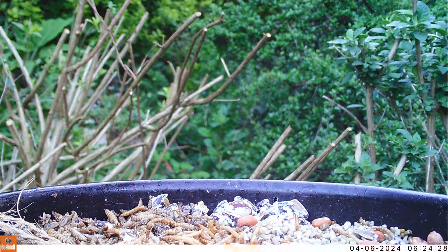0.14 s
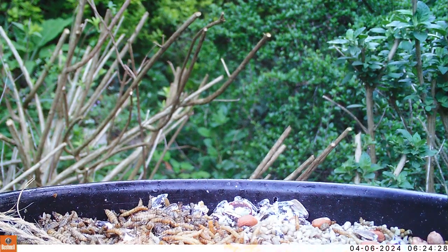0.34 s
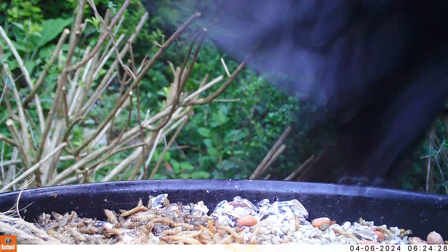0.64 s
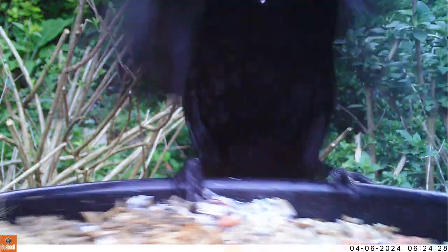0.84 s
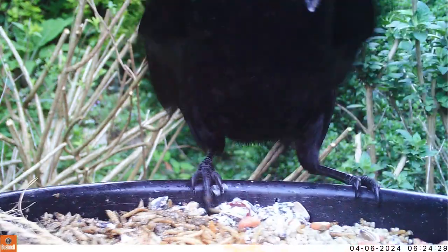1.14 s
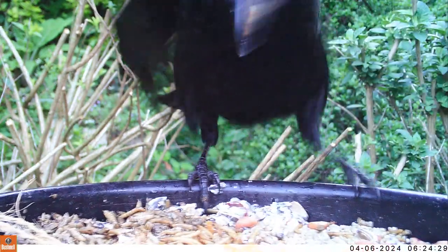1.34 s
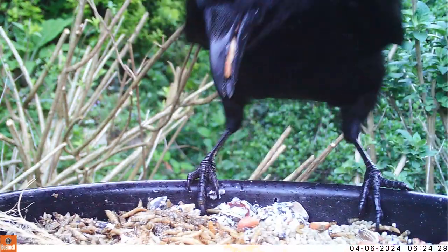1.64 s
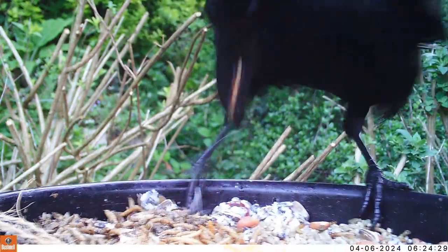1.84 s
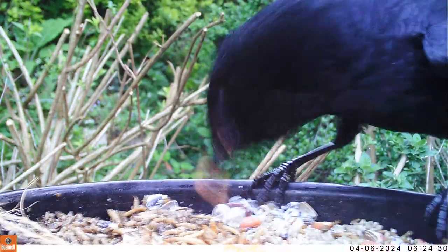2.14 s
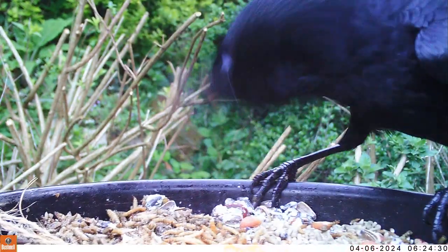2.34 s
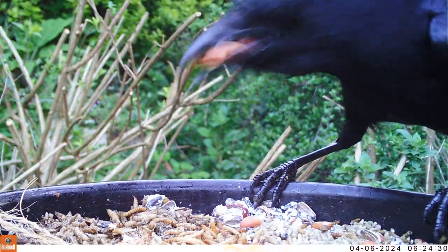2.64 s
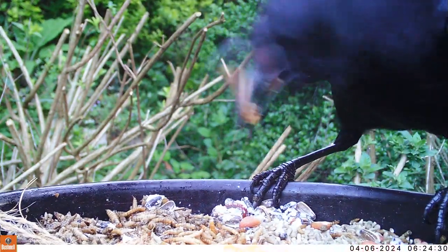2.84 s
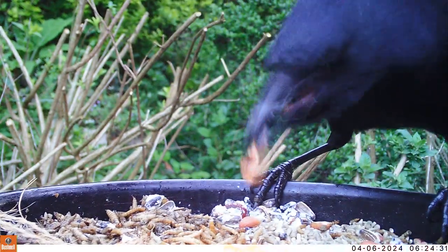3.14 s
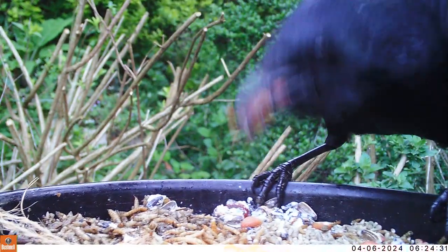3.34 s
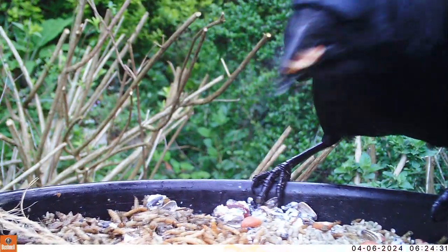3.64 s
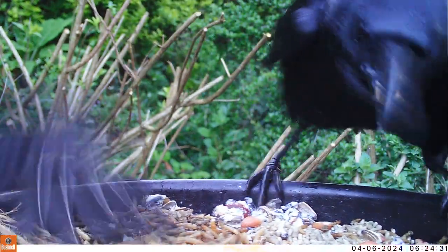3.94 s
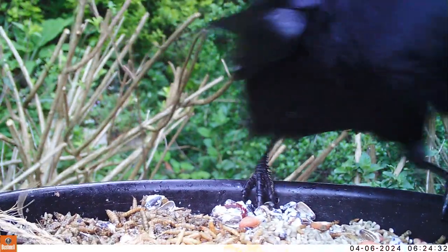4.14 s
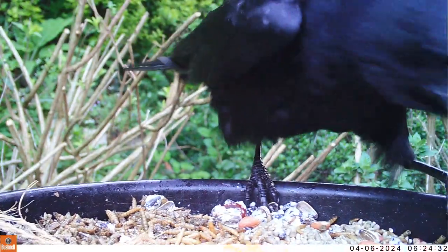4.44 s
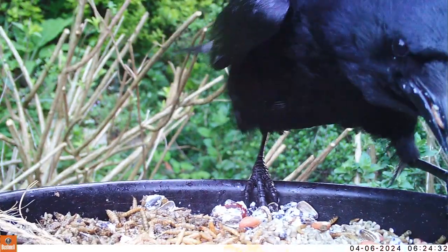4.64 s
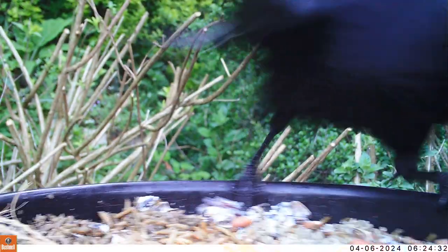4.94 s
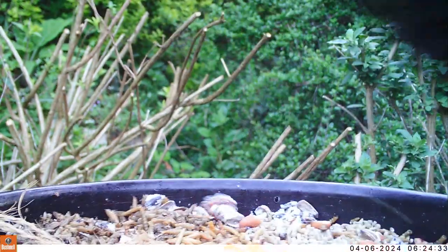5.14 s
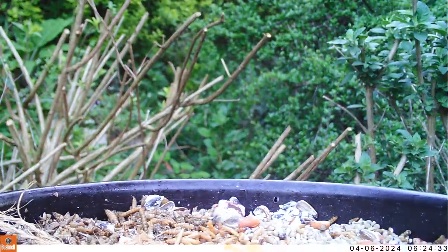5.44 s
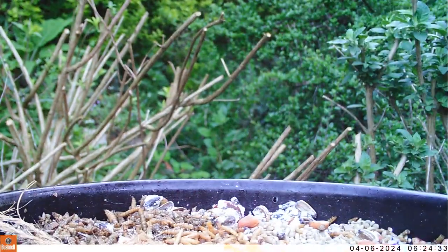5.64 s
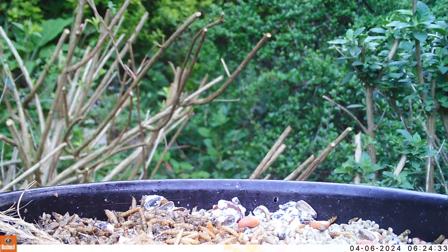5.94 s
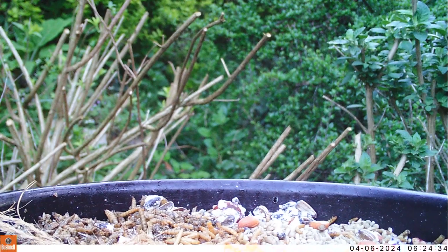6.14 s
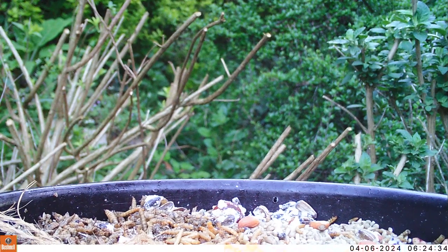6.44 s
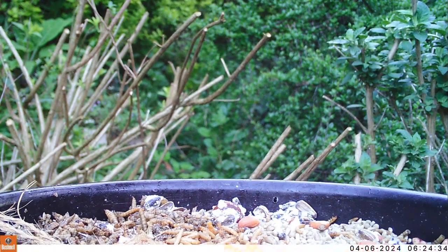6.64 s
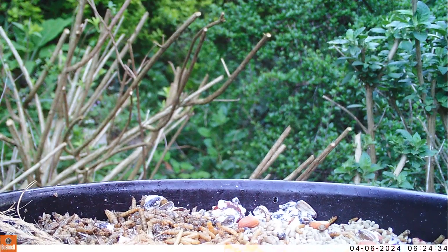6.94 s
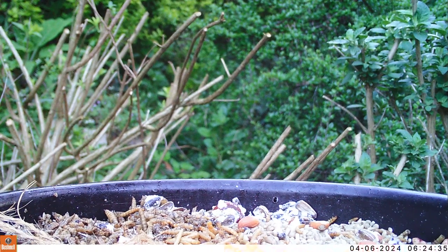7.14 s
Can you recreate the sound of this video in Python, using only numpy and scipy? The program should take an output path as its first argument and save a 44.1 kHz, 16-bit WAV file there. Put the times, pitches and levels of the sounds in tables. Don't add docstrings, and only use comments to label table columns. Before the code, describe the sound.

Loud raspy caws near the microphone, distant echoing crow calls, sharp claw and beak ticks on hard plastic, then low buffeting gusts.

```python
import sys
import numpy as np
from scipy import signal
from scipy.fft import rfft, irfft
from scipy.io import wavfile
from scipy.ndimage import uniform_filter1d

SR = 44100
rng = np.random.default_rng(int(sys.argv[2]) if len(sys.argv) > 2 else 0)


def to_wav(s):
    ch = np.atleast_2d(s).T
    pcm = np.round(np.clip(ch, -1, 1) * 32767)
    wavfile.write(sys.argv[1], SR, pcm.astype(np.int16))


def natural_amplitude(level_db):
    exponent = np.asarray(level_db, float) / 20
    return 10 ** exponent


N = 321048
T = np.arange(N) / SR


def slack_flutter(rate_hz, since_s):
    rush, rush_s = .6, .04
    rate_hz = rate_hz * (1 + rush * np.exp(-since_s / rush_s))
    cycle = np.cumsum(rate_hz * (1 + .04 * walk(30, since_s.shape))) / SR % 1
    ramp = uniform_filter1d(2 * cycle - 1, size=110)
    return ramp * (1 + .12 * walk(50, since_s.shape))


# centre_hz, relative_width, gain_db
NARROW = [
    (3790, 0.042, 5.5),
    (1267, 0.013, -7.5),
    (4746, 0.035, -9.5),
    (1876, 0.022, -9),
    (2620, 0.059, -4),
]


def vocal_tract(f_hz, k, opening, table, build, patchy_db=2.2):
    def between(shut, wide):
        return shut + (wide - shut) * opening

    throat_hz, throat_db = between(1460, 2140), between(11, 3)
    beak_hz, beak_db = between(3850, 3078), between(2, 7)
    throat_share, beak_share, overtone, overtone_db, _ = build
    shape_db = throat_share * throat_db * bump(f_hz / throat_hz, .12)
    shape_db += beak_share * beak_db * bump(f_hz / beak_hz, .052)
    shape_db += overtone_db * bump(k / overtone, .045)
    for centre_hz, width, gain_db in NARROW:
        shape_db += gain_db * bump(f_hz / centre_hz, width)
    shape_db += patchy_db * np.sqrt(np.minimum(f_hz, 2500) / 2000) * walk(40, f_hz.shape)
    size = gain_at(table, f_hz) * natural_amplitude(shape_db)
    return size / np.sqrt((size ** 2).sum(axis=0) / 2)


def breath_noise(phase, table):
    gate = 1 + .27 * np.cos(phase)
    breath = np.gradient(colour(rng.standard_normal(len(phase)) * gate, table))
    return breath / breath.std()


def add_echo(dry, echo_db):
    t60_s, gap_s = .45, .012
    lag = T[:SR // 2]
    echo = rng.standard_normal(len(lag)) * np.exp(-np.log(1000) * lag / t60_s) * (lag > gap_s)
    wet = signal.fftconvolve(dry, echo / np.sqrt(np.sum(echo ** 2))) * natural_amplitude(echo_db)
    wet[:len(dry)] += dry
    return wet


def caw(rows, table, flutter, rasp, build, jitter=.07):
    slack_share, slack_span, unsettled, edge_s = .92, .25, .45, .0018
    s, *columns = np.transpose(rows)
    t = T[int(s[0] * SR):int(s[-1] * SR)]
    hz, db, opening = (np.interp(t, s, c) for c in columns)
    rate_hz, swing, swing_db, breath_db, echo_db, hoarse = flutter
    since = t - t[0]
    rough = rasp + np.maximum(slack_share - hz / np.median(hz), 0) / slack_span
    hoarse = hoarse + unsettled / (1 + (since / build[-1]) ** 8) + rough
    rough = np.clip(rough, 0, 1)
    ramp = slack_flutter(rate_hz, since)

    wobble = jitter * rough ** 2 * walk(250, t.shape) + .006 * walk(30, t.shape)
    hz = hz * (1 + swing * ramp + wobble)
    phase = 2 * np.pi * np.cumsum(hz) / SR
    k = np.arange(1, 14000 // hz.mean())[:, None]
    f_hz = k * hz
    size = vocal_tract(f_hz, k, opening, table, build)
    scatter = hoarse * (f_hz / 4000) ** 1.1 * walk(260, f_hz.shape) + .8 * walk(14, f_hz.shape)
    voice = (size * np.sin(k * phase + .12 * k ** 2 + scatter)).sum(axis=0)

    share = np.clip(natural_amplitude(breath_db) + .8 * rough ** 4, 0, 1)
    mix = np.sqrt(1 - share ** 2) * voice + share * breath_noise(phase, table)
    edge = np.minimum(1, np.minimum(since, t[-1] - t) / edge_s)
    snap_db = swing_db * (1 + 1.5 * rough ** 2) * (ramp - ramp ** 2)
    return int(s[0] * SR), add_echo(mix * natural_amplitude(db + snap_db) * edge, echo_db)


# time_s, pitch_hz, level_db, beak_opening (0-1)
NEAR = [
    [(0.12, 262.2, -44.5, 0), (0.14, 275.2, -25, .1), (0.176, 343, -19, .5), (0.256, 372.6, -14.5, 0.9),
     (0.304, 352.3, -14.5, 0.95), (0.43, 345.4, -16.5, 0.8), (0.53, 331.3, -21, 0),
     (0.562, 306.2, -22, 0.1), (0.603, 238, -41, 0)],
    [(0.825, 240.2, -33.5, 0.36), (0.879, 301.7, -20, 0.6), (0.891, 318, -22, 0.55),
     (0.921, 279.6, -22.5, 0.73), (1.0, 325.8, -19, 0.2), (1.052, 319, -19, 0.2), (1.142, 300.9, -20, 0.66),
     (1.178, 256.3, -24, 0.6), (1.22, 249.3, -47, 0.5)],
    [(3.333, 291.8, -25, 0), (3.345, 319.2, -18, 0.46), (3.374, 361.8, -14.5, 0.87), (3.425, 372.3, -14, 1),
     (3.5, 337.6, -13, .3), (3.642, 327.7, -15, 0.33), (3.72, 309.6, -14.5, 0.01),
     (3.764, 236.8, -24.5, 0.12), (3.79, 226, -52.5, 0)],
]
# time_s, pitch_hz, level_db, beak_opening (0-1)
FAR = [
    [(1.464, 405, -61, 0.6), (1.494, 442.4, -50, 0.93), (1.762, 362.2, -47, 0.62), (1.81, 300, -53, 0.33),
     (1.85, 263, -64, .3)],
    [(2.18, 390.3, -45.5, .7), (2.208, 430.5, -43, 1), (2.494, 343.4, -43.5, 0.4), (2.54, 289.2, -47, .2),
     (2.58, 266.7, -64, 0.1)],
    [(5.59, 285.7, -48, 0.8), (5.6, 312, -46.5, .6), (5.694, 329, -43.5, .7), (5.996, 315.2, -43.5, 0.8),
     (6.196, 286.4, -42.5, 0.02), (6.24, 257, -68.5, 0.1)],
    [(1.89, 318, -59, 0.3), (1.946, 394.4, -51.5, 0.5), (2.224, 312.4, -59, .4), (2.25, 277, -65, .4)],
]
# freq_hz, gain_db
NEAR_COLOURS = [
    [(180, -75), (300, -36.5), (940, -13.5), (1400, -16.5), (1700, -7.5), (2030, -6), (2390, 0),
     (3240, -1.5), (4690, -14), (5780, -14), (9370, -30.5), (11700, -25), (12900, -45.5), (14000, -64)],
    [(160, -67.5), (280, -41), (1200, -14.5), (1510, 5.5), (1640, -11.5), (1930, -18.5), (2310, -12),
     (2550, -20), (2900, -22), (3210, -10.5), (4910, -10), (7040, -28.5), (7640, -26), (11900, -24),
     (14000, -35)],
    [(180, -70), (300, -39.5), (1050, -10), (1300, -20.5), (1450, -5.5), (1600, -2.5), (1790, -10.5),
     (2200, -11.5), (3870, 0), (4060, -7.5), (4690, -12.5), (6270, -12), (9670, -26.5), (10700, -22),
     (12400, -25.5), (13100, -50), (14000, -60)],
]
# freq_hz, gain_db
FAR_COLOURS = [
    [(350, -35), (600, -17), (1590, -2), (1880, 0), (2600, -6), (3020, 1), (3840, -3), (4690, -16.5),
     (5950, -12.5), (7180, -18), (12000, -19.5), (15600, -47.5), (22000, -120)],
    [(350, -54), (600, -23.5), (1140, -2.5), (1480, -7), (1720, 3), (2840, -5), (3740, 2), (4990, -16.5),
     (6020, -13), (7180, -24), (12000, -21.5), (15600, -55), (22000, -120)],
    [(400, -35), (650, -18.5), (1000, -9), (1600, 8), (2000, -1), (2550, -1), (3100, -0.5), (4100, -13),
     (4600, -12.5), (5500, -8), (6300, -16), (7000, -22), (12000, -46)],
    [(500, -13), (750, -7.5), (1100, 3.5), (1300, -8), (1600, -28)],
]
# rate_hz, pitch_swing (0-1), level_swing_db, breath_db, echo_db, hoarseness
FLUTTER = [
    (60, .003, .8, -30, -33, .1),
    (70, .003, .8, -31, -33, .1),
    (52, .04, 3.6, -28, -33, .12),
    (66, .038, 3.8, -21, -8, .25),
    (66, .038, 3.8, -21, -8, .25),
    (46, .035, 3.6, -18, -9, .45),
    (66, .02, 3, -20, -13, 1.2),
]
RASP = [.03, .03, .2, .2, .2, .33, .15]
# throat_share, beak_share, overtone (multiple of pitch), overtone_db, settle_s
BUILD = [
    (.4, .7, 16.2, 7, 0.21),
    (1.1, .9, 15.8, 6.5, 0.15),
    (1.1, 0.8, 17.5, 4, 0.056),
    (.9, 0.75, 15.5, 12.5, .05),
    (.9, .9, 15.5, 12, .05),
    (.9, .9, 17.5, 2, .05),
    (.9, .9, 15.5, 3, .05),
]


def crows():
    out = np.zeros(N + SR)
    for bird in zip(NEAR + FAR, NEAR_COLOURS + FAR_COLOURS, FLUTTER, RASP, BUILD):
        start, sound = caw(*bird)
        out[start:start + len(sound)] += sound
    return out[:N]


# time_s, peak_db,
# sharpness_db, thud_db, length_s
TICKS = [(0.8042, -16.5, -25, -45, 0.0097), (0.809, -2, -23.5, -39, 0.014), (0.8178, -8, -49, -24, 0.0095),
         (2.0615, -39.5, -26, -12, 0.1), (2.1031, -34, -23, -10, 0.0025), (2.157, -30.5, -11.5, -22, 0.013),
         (2.1633, -29, -18, -21, 0.022), (2.193, -30, -22.5, -23, 0.012), (3.3116, -22.5, -27, -31, 0.021),
         (3.323, -15.5, -25, -33.5, 0.013), (3.327, -10.5, -20, -36, 0.027), (3.9768, -36, -9, -24, 0.035),
         (4.067, -22.5, -9.5, -19, 0.046), (4.0737, -24, 6, -3, 0.011), (4.0785, -19.5, -27, -21, 0.012),
         (4.3933, -35, -12, -13, 0.019), (5.057, -36, -46.5, -29.5, 0.022),
         (5.198, -39.5, -43, -59.5, 0.04), (5.204, -27.5, -37.5, -54, 0.04),
         (5.2102, -26.5, -22, -50, 0.015), (5.3064, -44, 6, 1.5, 0.029), (5.467, -31, -11, -9, 0.021),
         (5.4975, -30, -30, -20, 0.016), (5.5572, -16.5, -12.5, -23, 0.011),
         (5.5592, -20.5, -20, -13.5, 0.017), (6.2093, -29, -18, -26, 0.037)]
# time_s, peak_db, sharpness_db
TAPS = [(1.3905, -40, -37.5), (1.561, -37.5, -24.5), (2.0231, -40.5, -41), (2.075, -44, -30.5),
        (2.803, -54.5, -5), (3.139, -51.5, -13), (3.2362, -47.5, -20), (3.941, -39, -11.5),
        (4.198, -40.5, -15), (3.947, -46, -8.5), (4.14, -41, -13), (2.149, -39, -30.5), (2.066, -44, -13.5),
        (5.28, -52, -30), (5.484, -43.5, -25), (5.577, -36.5, -12), (4.4623, -43.5, -17),
        (4.593, -44, -8.5), (4.796, -44.5, -16), (5.371, -39.5, -14.5), (5.938, -37, -10.5),
        (6.406, -47, -3.5), (6.505, -58, -7), (6.66, -48, -24), (7.155, -58.5, 4.5)]
# freq_hz, gain_db
HOUSING = [(350, -64), (600, -18.5), (685, -27.5), (762, -21), (1060, -19.5), (1330, -19), (2550, -14.5),
           (3250, -10.5), (3700, -3), (4000, -0.5), (4690, -15.5), (8180, -21), (8980, -20), (11900, -13.5),
           (14300, -30)]


def housing_click(burst, sharp_db):
    table = []
    for hz, db in HOUSING:
        db = db + (sharp_db + 12) * (hz > 5000)
        db = db + min(sharp_db + 28, 0) * (hz < 2600)
        table.append((hz, db))
    return colour(burst, table)


def ticks():
    tray_hz, tap_thud_db, tap_s = 650, -17.5, .012
    size, lead = 4096, 40
    out, lag = np.zeros(N + size), T[:size]
    hits = TICKS + [(*tap, tap_thud_db, tap_s) for tap in TAPS]
    tray = signal.butter(1, [tray_hz / 4.3, tray_hz], "band", fs=SR, output="sos")
    for s, db, sharp_db, thud_db, length_s in hits:
        scratch, blow = rng.standard_normal((2, size))
        fade = np.exp(-np.log(1000) * lag / np.clip(length_s, .003, .09))
        burst = scratch * (fade + .053 * np.exp(-lag / .016))
        click = housing_click(np.roll(burst, lead), sharp_db) * (lag < .08)
        thud = signal.sosfilt(tray, blow * np.sqrt(fade))
        hit = click / np.abs(click).max() + natural_amplitude(thud_db) * thud / np.abs(thud).max()
        start = int(s * SR) - lead
        out[start:start + size] += natural_amplitude(db) * hit
    return out[:N]


# time_s, peak_db, rise_s_per_20db, fall_s_per_20db (negative: abrupt)
RUSTLE = [(0.08, -58.5, 2, .5), (0.8, -56.5, 2.5, 0.15), (1.24, -64, -0.1, 0.3), (1.88, -65, 1, 1),
          (2.15, -59, -0.3, 1.), (2.815, -73, -2.4, 1.5), (3.154, -59.5, -0.34, 0.1),
          (3.29, -61, -0.35, 1.5), (4.04, -61, 0.34, -1.5), (4.068, -51.5, 0.18, 0.21),
          (4.108, -55, 0.02, -0.6), (4.2, -60.5, -2.7, 0.3), (4.388, -59, -2.08, 0.26),
          (4.59, -62.5, -0.33, 0.14), (4.798, -63.5, -0.07, 0.1), (5.04, -73, 0.4, -8.5),
          (5.206, -58, -0.11, -1.63), (5.295, -56.5, 0.2, 2), (6.24, -60, 2., -0.3),
          (6.402, -71.5, -3.7, -0.5), (6.51, -71, -0.8, -0.7), (6.816, -74.5, -0.5, -2),
          (7.136, -73, -0.5, .08), (7.28, -79, -2.2, -1)]


def feathers():
    still_db = -83.5
    grain_db = 1.5 * np.minimum(rng.exponential(size=N // 64 + 1), 4.5)
    grains = natural_amplitude(grain_db.repeat(64)[:N])
    rustle = colour(rng.standard_normal(N) * grains, HOUSING)
    return rustle * swells(RUSTLE, still_db) * natural_amplitude(4.5 + .91 * walk(30, (N,)))


# time_s, length_s, start_hz, end_hz, level_db
WHISTLES = [
    (1.88, .3, 5150, 5100, -79),
    (2.98, .14, 7650, 7600, -86),
    (4.73, .05, 6620, 6580, -76),
    (4.81, .12, 2950, 2870, -69),
    (4.925, .065, 4090, 3950, -62),
    (6.25, 1.0, 1510, 1495, -81),
]


def whistles():
    out = np.zeros(N)
    for s, length_s, start_hz, end_hz, db in WHISTLES:
        span = slice(int(s * SR), min(N, int((s + length_s) * SR)))
        count = span.stop - span.start
        hz = np.linspace(start_hz, end_hz, count) * (1 + .0074 * walk(40, (count,)))
        swell = np.sqrt(np.hanning(count)) * natural_amplitude(db + 3 + 3 * walk(25, (count,)))
        out[span] += swell * np.sin(2 * np.pi * np.cumsum(hz) / SR)
    return out


# time_s, peak_db, rise_s_per_20db, fall_s_per_20db
WIND = [(0.12, -45, 1., .6), (0.6, -48, .8, 3.), (1.26, -50, 2., 1.), (2.09, -47, .8, .2),
        (4.05, -46, .4, 1.1), (4.85, -47.5, 2., .25), (5.13, -44, .2, .6), (5.33, -31, .1, .3),
        (5.44, -29, .15, .14), (5.77, -31, .15, .2), (5.93, -33, .2, .2), (6.07, -29, .06, .2),
        (6.14, -32, .1, .12), (6.35, -31, .03, .07), (6.6, -52, .3, 1.5), (7.12, -48.5, .35, .8)]
# freq_hz, gain_db
WIND_COLOUR = [(10, -27.5), (17, 8.5), (53, -7.5), (140, -22), (226, -31), (346, -43.5), (428, -57.5),
               (500, -40.5), (650, -72.5), (1100, -120)]


def wind():
    calm_db = -49.5
    rumble = colour(rng.standard_normal(N), WIND_COLOUR)
    rumble = rumble / np.sqrt(uniform_filter1d(rumble ** 2, size=5000))
    gust = uniform_filter1d(swells(WIND, calm_db), size=1200)
    return rumble * gust * natural_amplitude(2.5 * walk(14, (N,)) - 3)


# freq_hz, gain_db
GARDEN = [(59, -30), (100, -2), (142, -4.5), (198, -9.5), (282, -11.5), (537, -17.5), (584, -18.5),
          (1210, -24.5), (1550, -27), (2160, -40.5), (3100, -39), (3940, -28.5), (4950, -39.5),
          (10500, -46), (13100, -34.5), (14300, -37.5)]


def garden():
    level_db = -63.5
    return colour(rng.standard_normal(N), GARDEN) * natural_amplitude(level_db + .55 * walk(4.6, (N,)))


def bump(ratio, width):
    return np.exp(-(np.log(ratio) / width) ** 2)


def gain_at(table, hz):
    f, db = np.transpose(table)
    return natural_amplitude(np.interp(np.log(hz + 1), np.log(f), db, left=-90, right=-90))


def colour(x, table):
    y = irfft(rfft(x) * gain_at(table, np.fft.rfftfreq(len(x), 1 / SR)), len(x))
    return y / np.sqrt(np.mean(y ** 2))


def walk(rate_hz, shape):
    coarse = 8
    k, count = int(SR / rate_hz / coarse), shape[-1] // coarse + 1
    held = rng.standard_normal((*shape[:-1], count // k + 1))
    held = np.repeat(held, k, axis=-1)[..., :count]
    slewed = uniform_filter1d(uniform_filter1d(held, k), k)
    return 1.4 * np.repeat(slewed, coarse, axis=-1)[..., :shape[-1]]


def swells(rows, floor_db):
    s, db, rise, fall = (c[:, None] for c in np.transpose(rows))
    since = T[::64] - s
    rising, falling = -since / np.maximum(rise, 1e-3), since / np.maximum(fall, 1e-3)
    db = db - 20 * np.maximum(rising, falling)
    power = (natural_amplitude(db) ** 2).sum(axis=0) + natural_amplitude(floor_db) ** 2
    return np.interp(T, T[::64], np.sqrt(power))


def scene():
    return (crows() + ticks() + feathers() + whistles() + wind() + garden())[None]


def roll_off(x):
    return signal.sosfilt(signal.butter(12, 14000, fs=SR, output="sos"), x)


def record(dry):
    top = signal.butter(6, 13500, fs=SR, output="sos")
    rounded = np.tanh(.92 * dry) / .79
    return roll_off(signal.sosfilt(top, rounded))


dry = scene()
out = record(dry)
to_wav(out)
```